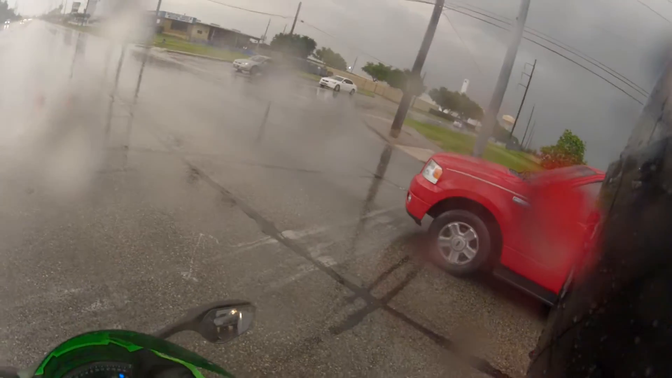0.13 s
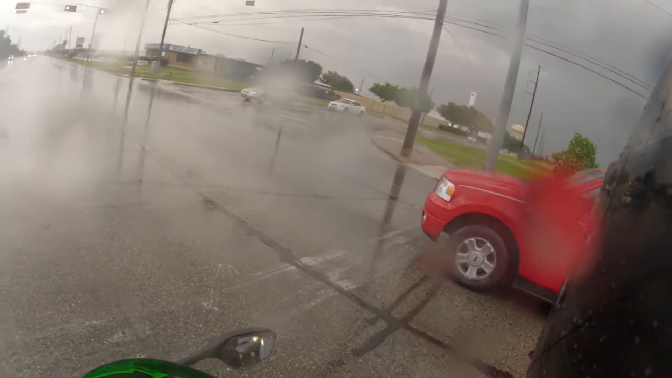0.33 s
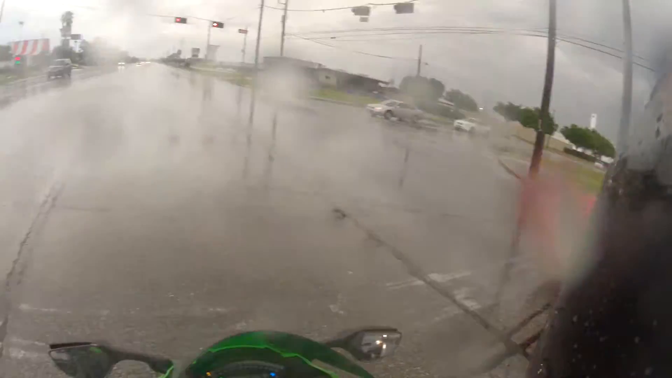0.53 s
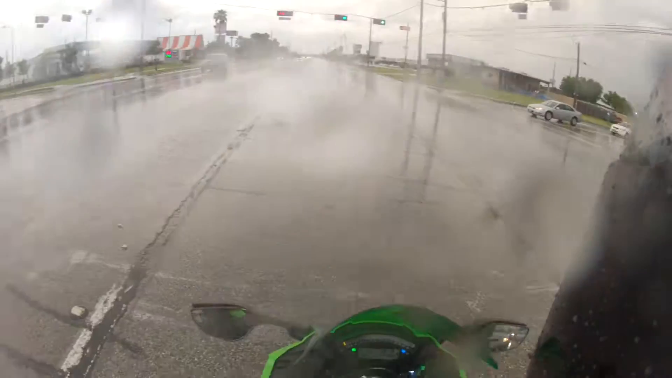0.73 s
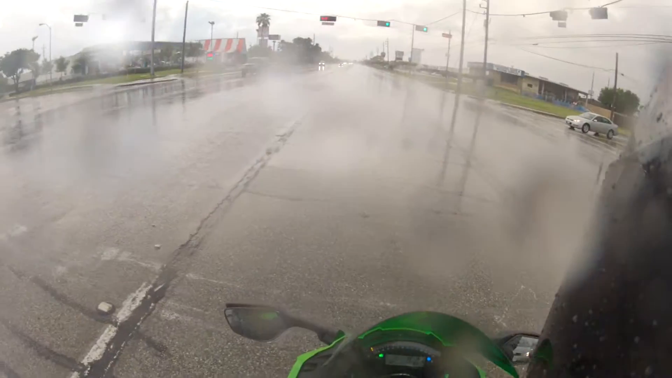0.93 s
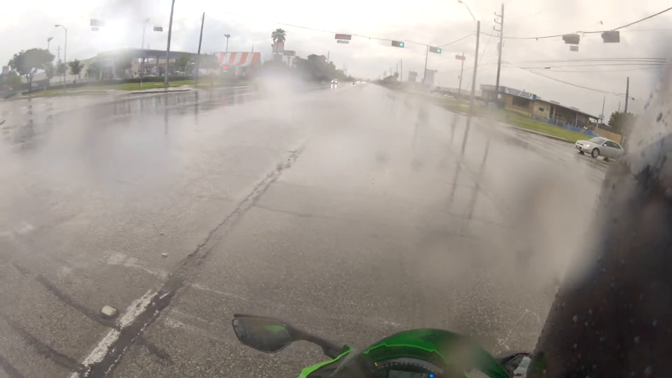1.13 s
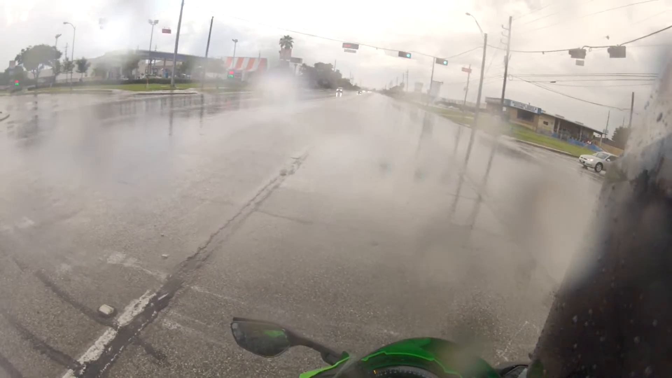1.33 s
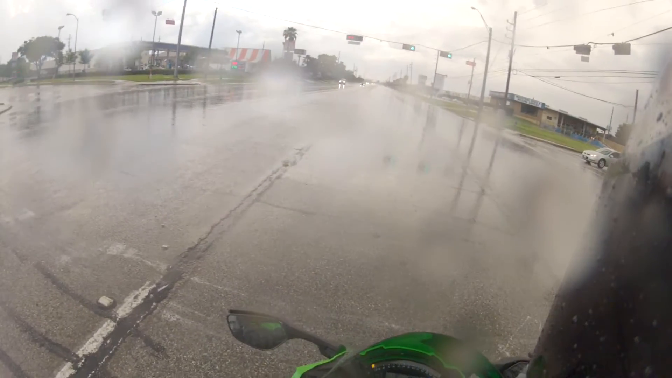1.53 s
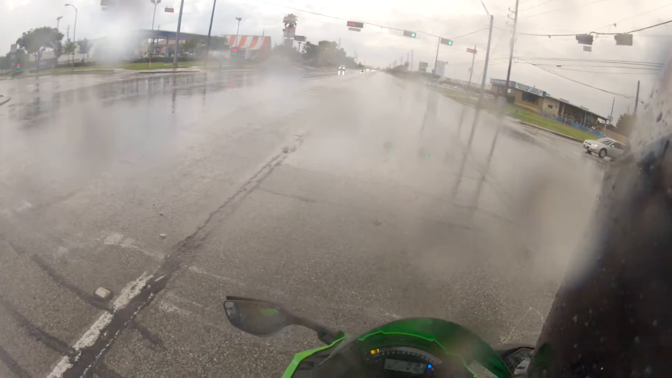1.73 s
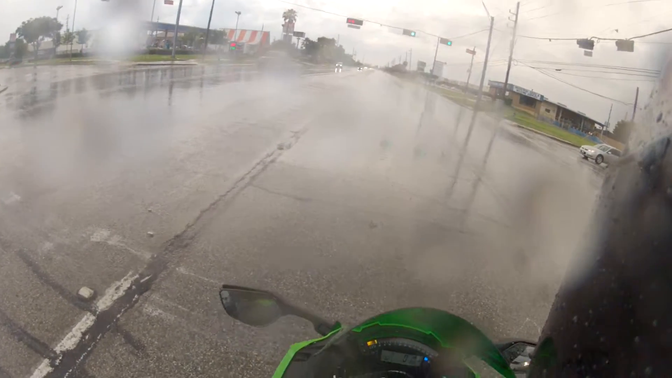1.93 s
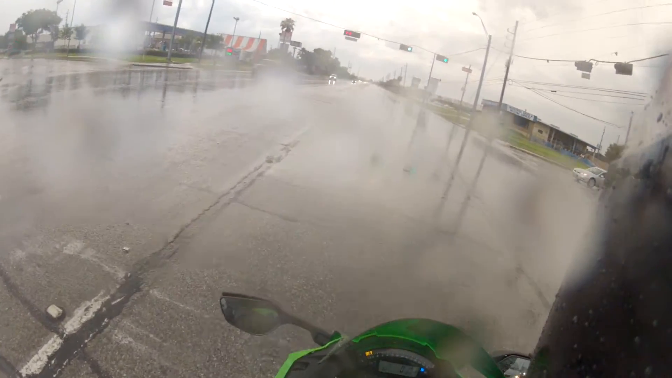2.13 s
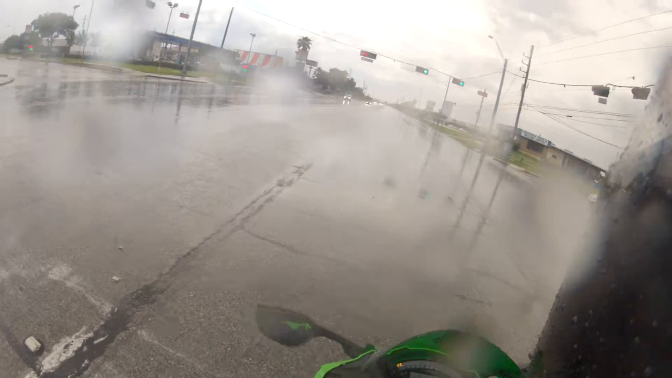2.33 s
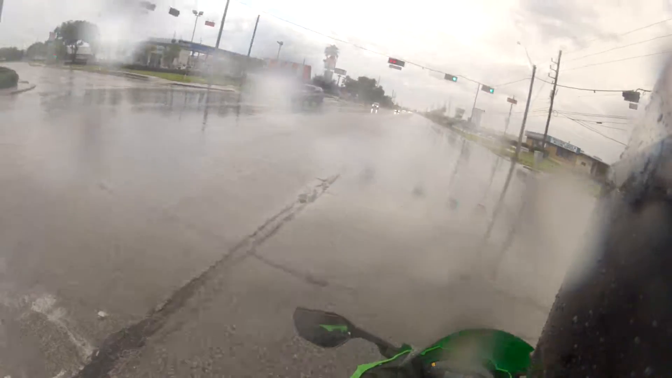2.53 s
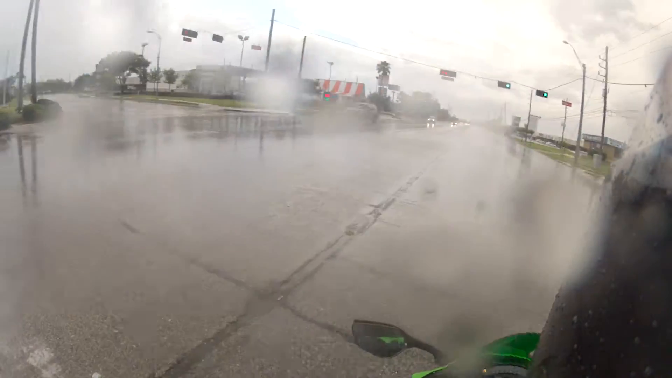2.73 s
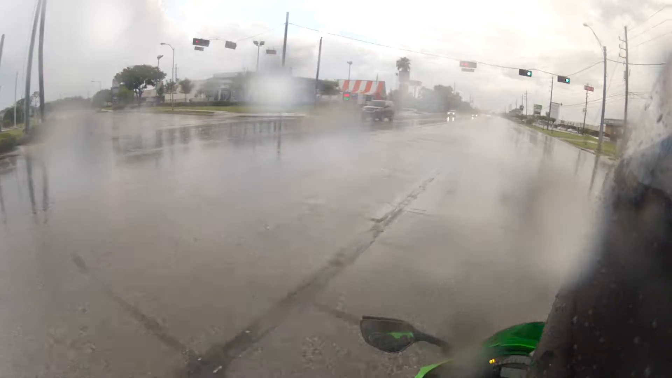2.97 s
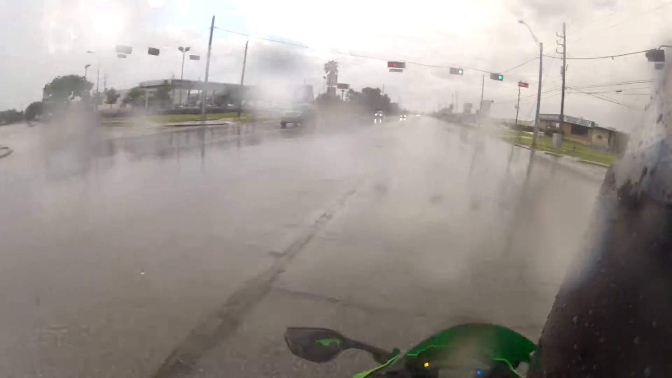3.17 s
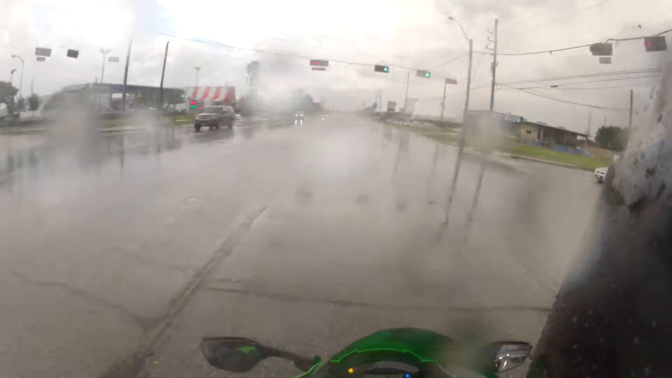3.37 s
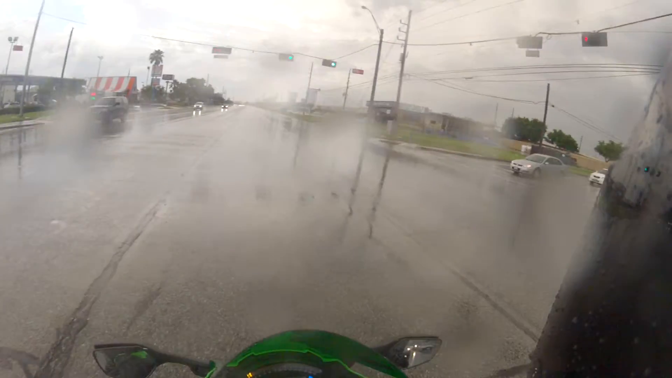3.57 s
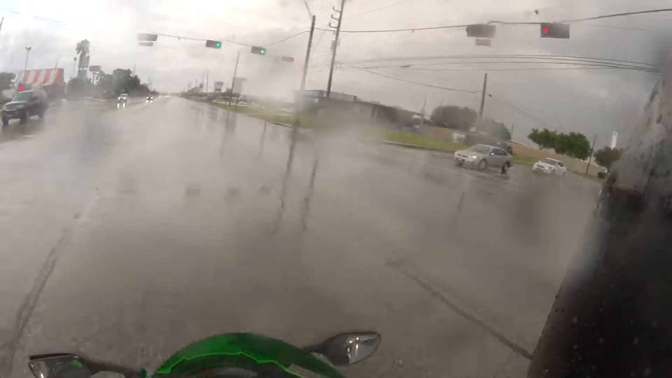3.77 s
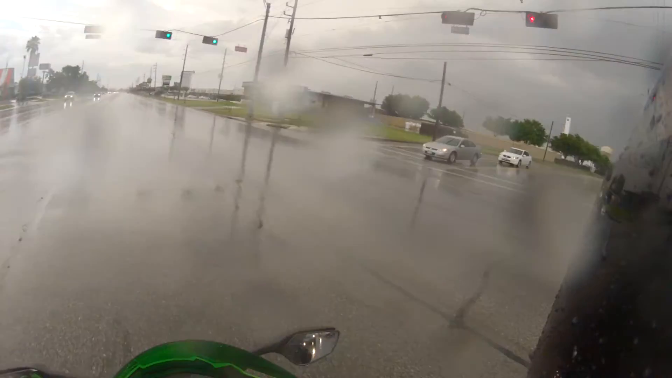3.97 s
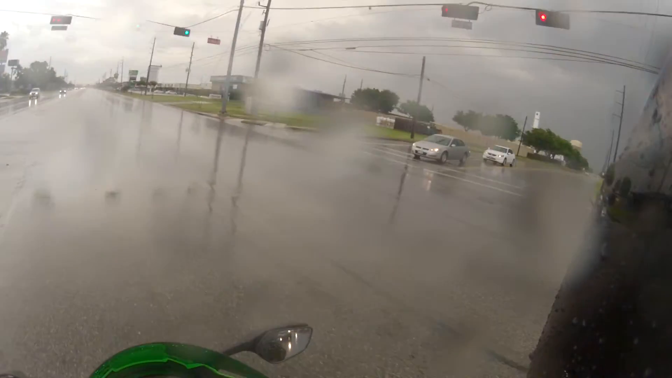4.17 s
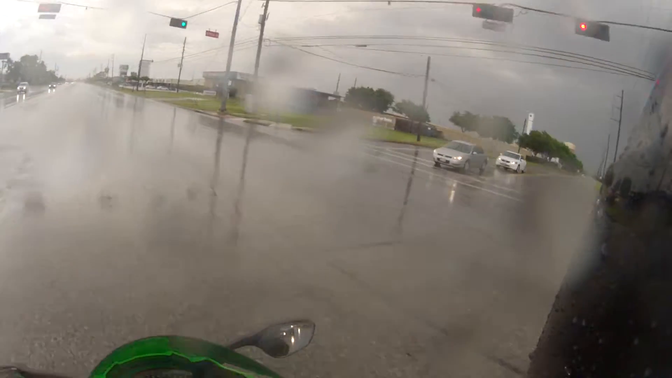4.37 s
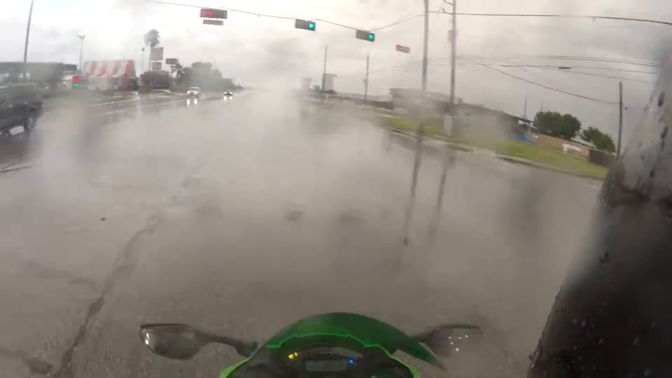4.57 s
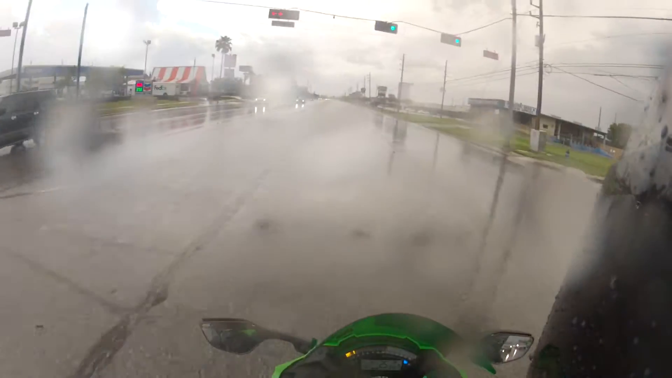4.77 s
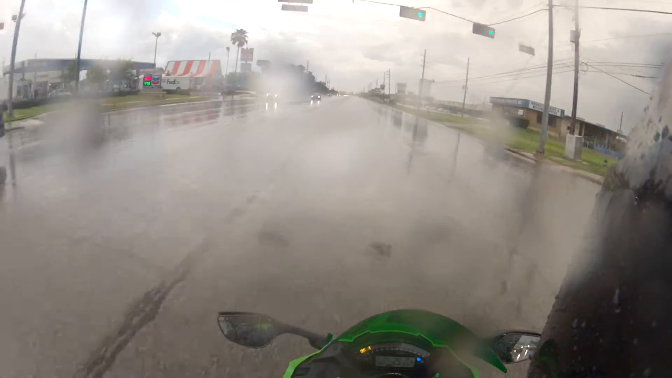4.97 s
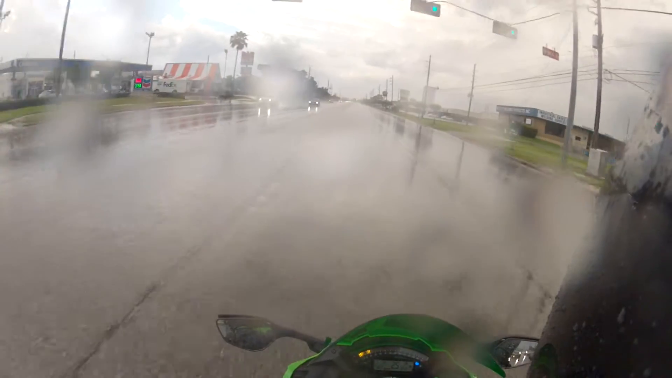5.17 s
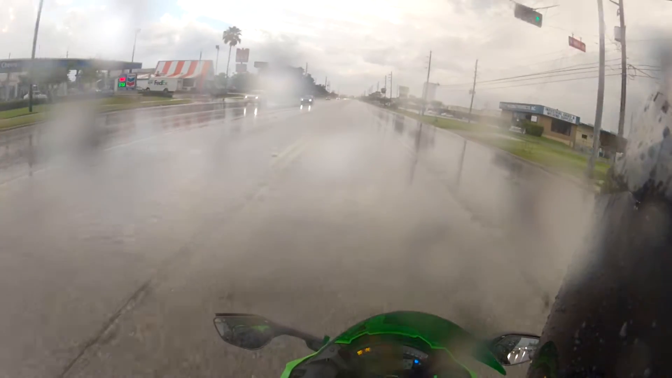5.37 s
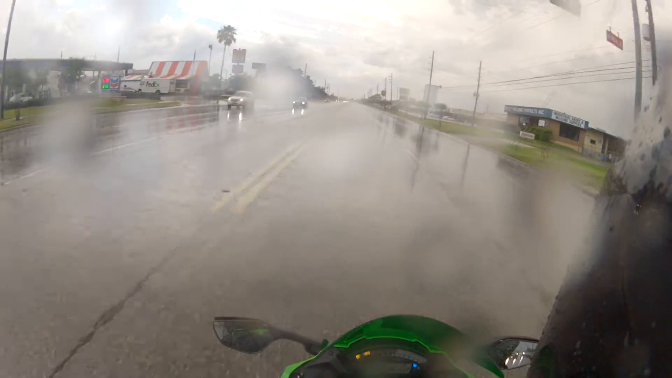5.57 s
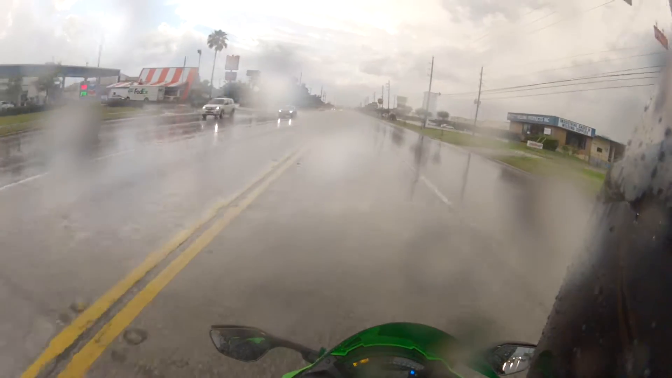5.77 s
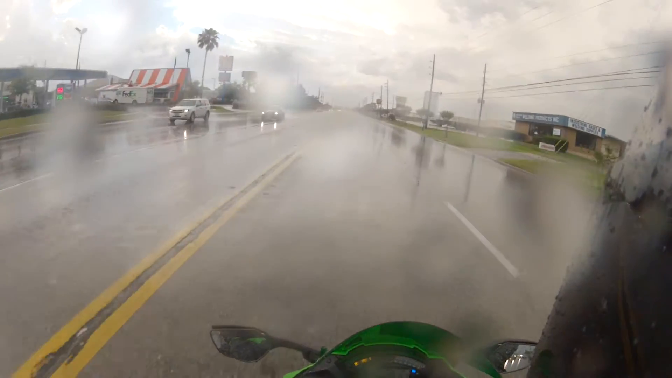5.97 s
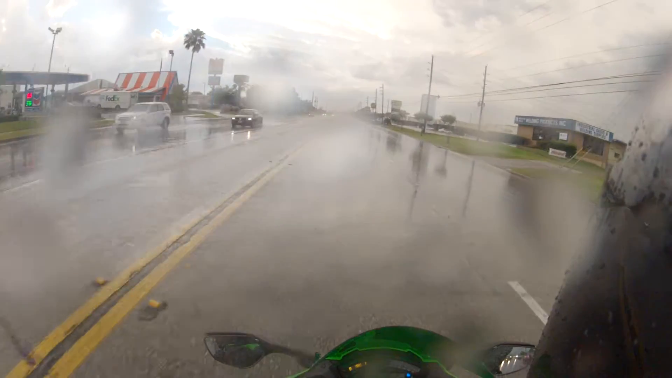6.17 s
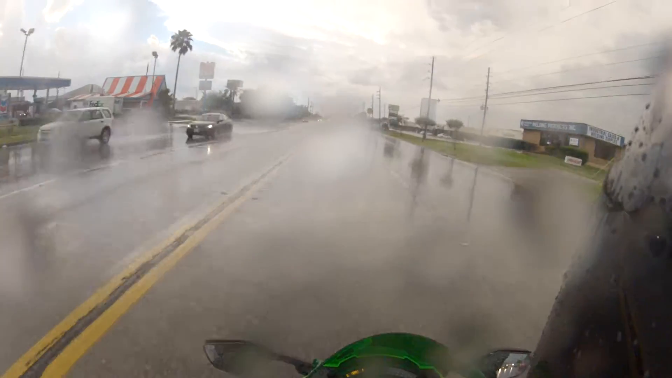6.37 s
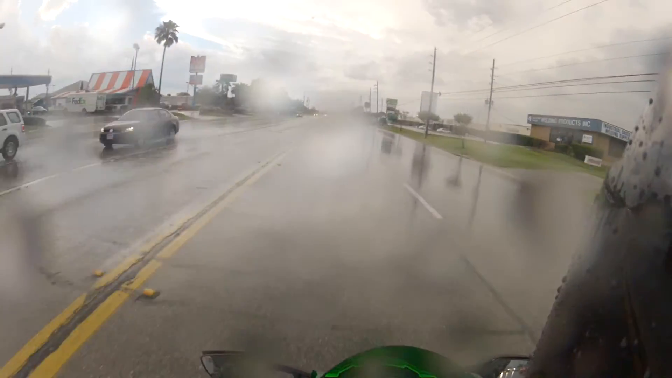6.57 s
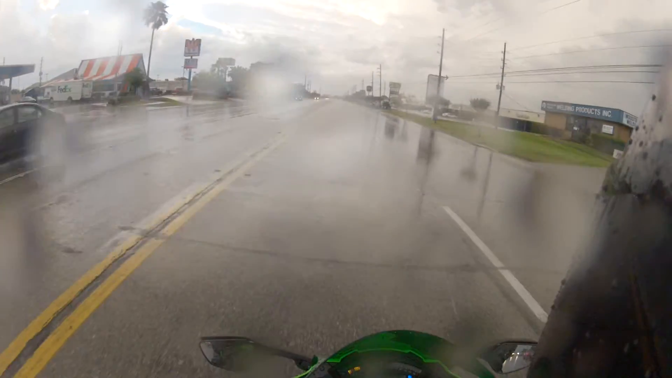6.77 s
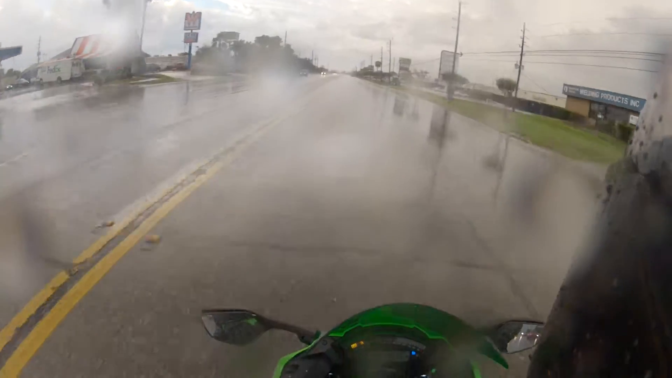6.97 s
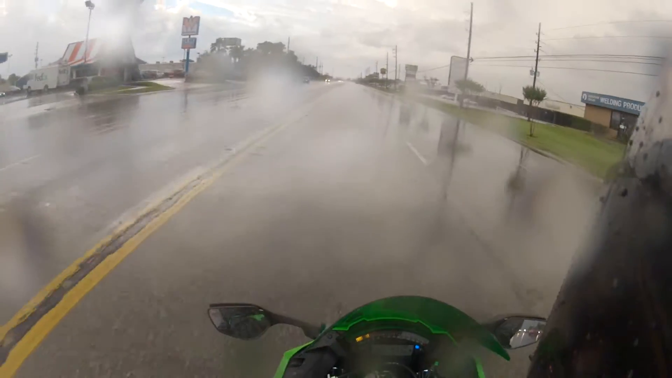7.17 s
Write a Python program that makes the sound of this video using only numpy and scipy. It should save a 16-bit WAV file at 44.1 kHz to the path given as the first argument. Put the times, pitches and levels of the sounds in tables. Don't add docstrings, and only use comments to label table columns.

```python
import sys
import numpy as np
from scipy import signal
from scipy.fft import rfft, irfft, next_fast_len
from scipy.io import wavfile
from scipy.ndimage import uniform_filter1d

SR = 44100
rng = np.random.default_rng(int(sys.argv[2]) if len(sys.argv) > 2 else 0)


def rack_gain(trim_db):
    fader = np.asarray(trim_db, float)
    return 10 ** (fader / 20)


def bounce(signal):
    frames = np.transpose(np.atleast_2d(signal))
    limited = np.clip(frames, -1, 1)
    pcm = np.round(limited * 32767).astype(np.int16)
    wavfile.write(sys.argv[1], SR, pcm)


N = 317961
TIME_S = np.arange(N) / SR
IDLE_END_S = 1.81

# mode_hz, width_hz, level_db
CASE_MODES = [(764, 62, -8.5), (1023, 216, 2), (1238, 210, 2.5), (1650, 500, -0.5), (2100, 650, 3.5),
              (2450, 380, 3.5), (2977, 530, -1.5), (3685, 444, -2), (4500, 3200, -10), (5206, 290, -5.5),
              (5855, 880, -8)]


def evened(x):
    return x / np.sqrt(np.mean(x ** 2) + 1e-20)


def curves(rows):
    s, *columns = np.transpose(rows)
    return [np.interp(TIME_S, s, column) for column in columns]


def slow(hz):
    lowpass = signal.butter(2, hz, fs=SR, output="sos")
    return evened(signal.sosfilt(lowpass, rng.standard_normal(N + SR))[SR:])


def ring(x, modes, size=16384):
    f = abs(np.fft.fftfreq(size, 1 / SR))
    power = sum(rack_gain(2 * db) / (1 + (2 * (f - hz) / width) ** 2) ** 2 for hz, width, db in modes)
    log_gain = np.log(power + 1e-9) / 2
    phase = -signal.hilbert(log_gain).imag
    taps = np.fft.ifft(np.exp(log_gain + 1j * phase)).real[:size // 2]
    return signal.oaconvolve(x, taps / np.linalg.norm(taps))[:len(x)]


def add(mix, s, sound):
    part = mix[round(s * SR):][:len(sound)]
    part += sound[:len(part)]


def idle(firing_hz=39.1, level_db=-52.5, uneven=0.11):
    turns = np.cumsum(firing_hz * (1 + uneven * slow(24.9))) / SR
    firings = np.diff(np.floor(turns), prepend=0)
    firings = evened(firings) + 1.2 * rng.standard_normal(N)
    silencer = [(40, 15, -10), (91.0, 43, 2.0), (112, 37, -5.0),
                (197, 56, -9.0), (280, 190, -13), (530, 310, -19.0)]
    fade_out = np.clip((IDLE_END_S - TIME_S) / 0.055, 0, 1)
    return rack_gain(level_db) * evened(ring(firings, silencer)) * fade_out


def gusts(bump_s=0.041):
    # peak_s, boom_lift_db, buffet_lift_db
    shoves = [(.56, 2, 12), (2.15, 0, 0), (2.49, 4.5, 0), (2.63, -4, 9), (2.97, 3, 9), (3.45, 3, 5),
              (4.1, 8.5, 6), (4.38, 3, 9), (4.521, 1, 0), (4.74, 9, -6), (4.8, 5.5, 22), (4.98, 7.5, 7),
              (5.14, 7, 5), (5.36, 7, 7), (5.54, 9, 6), (5.6, -8, 5), (5.68, 9.5, 9), (5.78, 8, -4),
              (5.86, 1.5, 7), (6.28, 8, 9), (6.42, 6.5, 4), (6.59, 2, 4), (6.9, 0.5, 2), (6.961, 6.5, 3),
              (7.05, 6, 0), (7.13, 10, 3), (7.19, -1, 3), (1.25, -2, 12)]
    t = np.arange(0, N, 64) / SR
    s, *lifts_db = np.transpose(shoves)
    bumps = np.exp(-((t[:, None] - s) / bump_s) ** 2)
    return [np.interp(TIME_S, t, bumps @ lift_db) for lift_db in lifts_db]


def air(patter_per_s=700, patter_share=0.18, size_db=2.5):
    # start_s, rush_db
    rush_levels = [(0.0, -51.5), (1.51, -53), (1.57, -49), (1.87, -43.5), (2.15, -44.5), (2.4, -46.5),
                   (2.97, -46.5), (3.43, -43.5), (3.63, -40), (4.16, -38), (4.7, -31.5), (5.42, -28.5),
                   (5.54, -24), (5.64, -27.5), (6.26, -23.5), (6.59, -23), (6.73, -25), (7.21, -24.5)]
    # mode_hz, width_hz, level_db
    buffet_modes = [(39.5, 43, -13), (74, 59, -23)]
    # mode_hz, width_hz, level_db
    boom_modes = [(115, 35, -4), (160, 45, 0), (215, 40, -15)]
    # mode_hz, width_hz, level_db
    whistle_modes = [(2660, 510, -3), (2720, 540, -15)]
    # mode_hz, width_hz, level_db
    roar_modes = [(250, 91, 1), (318, 124, 0), (458, 244, -1.7), (625, 227, -1.9)]

    rush_db = curves(rush_levels)[0]
    boom_lift_db, buffet_lift_db = gusts()
    standstill = np.clip((2.47 - TIME_S) / 0.15, 0, 1)
    boom_db = -32.5 + 0.91 * (rush_db + 24.5) + boom_lift_db - 5.5 * standstill
    buffet_db = -40.5 + 0.87 * (rush_db + 25) + buffet_lift_db
    whistle_db = -5 + 1.6 * (rush_db + 24.0) + 3.5 * slow(1.16)
    roar_db = -12.5 - 1.9 * standstill

    hiss = rng.standard_normal(N) * rack_gain(0.46 * slow(5.6) + 1.04 * slow(59))
    hits = (rng.random(N) < patter_per_s / SR) * rng.standard_normal(N)
    patter = hits * rack_gain(size_db * np.minimum(rng.exponential(1, N), 4))
    blend = np.sqrt(1 - patter_share) * evened(hiss) + np.sqrt(patter_share) * evened(patter)
    rush = evened(ring(blend, CASE_MODES))
    buffet = evened(ring(rng.standard_normal(N) * rack_gain(2.7 * slow(30)), buffet_modes))
    boom = evened(ring(rng.standard_normal(N) * rack_gain(1.5 * slow(14)), boom_modes))
    whistle = rack_gain(whistle_db) * evened(ring(np.roll(hiss, SR), whistle_modes))
    roar = rack_gain(roar_db) * evened(ring(hiss, roar_modes))
    return rack_gain(rush_db) * (rush + roar + whistle) + rack_gain(buffet_db) * buffet + rack_gain(boom_db) * boom


def raindrop(peak_db, ring_hz, splash_ms, treble_db, bass_db, edge):
    t = np.arange(1600) / SR
    splash = np.exp(-(t / (splash_ms / 1000)) ** edge) + 0.51 * np.exp(-t / 0.0026)
    splash = splash * np.minimum(t / 0.00055, 1)
    grain = rng.standard_normal(len(t)) + 0.28 * np.sin(2 * np.pi * ring_hz * t)
    click = 2.77 * np.exp(-((t - 0.0006) / 0.00003) ** 2)
    modes = []
    for hz, width, db in CASE_MODES:
        tilt_db = (treble_db + 15) * (hz > 3300) - 7.0 * (hz > 4000) + (bass_db + 8.5) * (hz < 1500)
        modes.append((hz, width, db + tilt_db))
    modes.append((480, 500, bass_db + 1.03 * min(peak_db, 9) - 8))
    modes.append((240, 260, bass_db + 0.97 * min(peak_db, 14) - 5.5))
    modes.append((ring_hz, 420, 5.0))
    sound = ring(splash * grain + click, modes, size=2048)
    return rack_gain(peak_db) * sound / abs(sound).max()


def rain():
    # start_s, blow_db before overload, ring_hz, splash_ms, bass_db
    splats = [
        (0.9912, -3.5, 2150, 2.1, -13.5),
        (4.6391, 3.5, 2100, 1.24, -9),
        (4.8022, 10.5, 2305, 3.1, -6.5),
        (5.0892, -.3, 2110, 0.72, -9),
        (5.4417, 17, 2272, 2.35, -5.5),
        (6.0678, 4, 3344, 1.65, -7),
        (6.4523, -0.5, 2450, 1.7, -32),
        (6.6444, 3.5, 3060, 4.1, -6.5),
        (6.755, 8.5, 1530, 2.3, 0),
        (7.1806, -1, 3140, 2.24, -10),
    ]
    # start_s, peak_db, ring_hz, treble_db, bass_db
    clear_drops = [(0.0214, -31.5, 1225, -24, -4), (1.006, -23.5, 1700, -11, -12),
                   (1.1607, -31, 1740, -12, -2), (1.1658, -27, 2350, -2, -6), (1.3743, -34, 1060, -19, -19),
                   (1.844, -17, 2260, -4, -12), (1.907, -28.5, 975, -8, 8), (1.9642, -29, 1250, -6, -13),
                   (2.555, -20.5, 3110, -6.5, -9), (2.954, -19, 1650, -13, -7.5),
                   (3.3241, -23, 2280, -5, -4.5), (3.7485, -21.5, 2230, -26, -1.5),
                   (3.8163, -20.5, 1650, -19, -3.5), (3.925, -26.5, 1030, -19, -2),
                   (3.974, -24, 2380, 0, -19), (3.9976, -11, 2270, -7.5, -31),
                   (4.1357, -24.5, 1090, -25, -2), (4.328, -17, 2130, 0, -11), (4.375, -11.5, 2210, -16, 2),
                   (4.3917, -12, 2110, -5, -4.5), (5.5619, -4, 1890, -15, -8), (6.3167, -5, 2310, 0, -30),
                   (6.885, -12.5, 1040, -10, -14), (7.152, -9, 2155, -1, -19)]
    # start_s, peak_db, ring_hz
    faint_drops = [(0.2338, -35, 2320), (0.7666, -36, 2320), (0.823, -33.5, 1090), (1.1504, -44, 1700),
                   (1.181, -36, 2280), (1.2095, -36, 2050), (1.222, -36, 1120), (1.5817, -39, 1730),
                   (1.6401, -34, 2300), (2.0568, -34, 1021), (2.1369, -29, 1860), (2.987, -31.5, 1016),
                   (3.027, -32, 1880), (3.3685, -30.5, 980), (3.731, -25, 1650), (3.7894, -28, 1690),
                   (4.0665, -30, 2033), (4.1049, -27, 1080), (4.226, -32, 1196), (4.3148, -21, 2180),
                   (4.7257, -23, 2110), (4.8592, -18, 2136), (5.0164, -13.5, 2380), (5.5258, -10, 2080),
                   (5.686, -9, 2500), (6.1507, -13, 1780), (6.52, -16, 1990), (6.7285, -13, 2320),
                   (6.8088, -15.5, 2450)]

    mix = np.zeros(N)
    for s, db, hz, ms, bass_db in splats:
        treble_db = -16 + 8 * (hz / 1000 - 2.2) + 0.1 * db
        add(mix, s, raindrop(db, hz, ms, treble_db, bass_db, edge=4))
    small_drops = [tuple(row) for row in clear_drops]
    small_drops += [tuple(row) + (-7.5, -3) for row in faint_drops]
    for s, db, hz, treble_db, bass_db in small_drops:
        driven = s > IDLE_END_S or db > -26
        splash_ms = 3 if driven else 5.1
        add(mix, s, raindrop(db, hz, splash_ms, treble_db, bass_db, edge=0.87))
    return mix


def engine(waver_db=1.7, waver_hz=9):
    # start_s, firing_hz, tone_db, throttle_0_to_1
    revs = [(1.5, 38, -60, .7), (1.7, 89.7, -42, .7), (1.8, 111.5, -42, .6), (1.91, 119.3, -40.5, .45),
            (2.05, 114.5, -38.5, .4), (2.4, 82, -43, .25), (2.71, 76.6, -42.5, .1),
            (2.96, 83.4, -42.5, .23), (3.23, 77, -42, .13), (3.65, 80, -42, .2), (3.92, 78.6, -40, .45),
            (4.54, 103.5, -36.5, .85), (5.41, 140, -35, .85), (5.92, 162.8, -31, .35),
            (6.43, 178.8, -32, 0), (6.58, 163, -43, .15), (6.85, 134.5, -43.5, .4), (7.21, 141.8, -39, 1)]
    # start_s, grip_0_to_1
    clutch = [
        (2.0, .2),
        (2.5, .75),
        (4.4, 1),
        (6.43, 1),
        (6.55, 0),
    ]
    # multiple, level_db
    whole_orders = [(2, -1.5), (3, 0), (4, -1.5), (5, 1), (6, -6), (7, -10), (8, -8), (9, -11), (10, -12)]
    # multiple, level_db
    half_orders = [(.5, -9), (1.5, -5), (2.5, 1), (3.5, 0), (4.5, -.5), (5.5, -6), (6.5, -9), (7.5, -1),
                   (8.5, -5), (9.5, -12)]
    # duct_hz, gain_db
    exhaust = [(150, -1.5), (190, -6), (240, 0), (340, 0), (390, -13), (470, -8), (560, -14), (680, -7),
               (800, -16), (1200, -24)]
    # duct_hz, gain_db
    air_box = [(40, -3), (250, -7), (350, -8), (400, -8), (480, 0), (530, -13), (700, -3), (800, -12),
               (1200, -22)]

    firing_hz, tone_db, throttle = curves(revs)
    muffled_db = 0.11 * np.maximum(firing_hz - 110, 0)
    whole_db = tone_db - 15 + 8.5 * curves(clutch)[0] - muffled_db
    half_db = tone_db - 22 + 15 * throttle
    phase = 2 * np.pi * np.cumsum(firing_hz) / SR
    sound = rack_gain(tone_db + 0.68 * slow(27)) * np.sin(phase)
    waver = waver_db * slow(waver_hz)
    families = (whole_orders, exhaust, whole_db), (half_orders, air_box, half_db)
    for orders, duct, family_db in families:
        duct_hz, duct_db = np.transpose(duct)
        for k, order_db in orders:
            colour_db = np.interp(np.log(k * firing_hz), np.log(duct_hz), duct_db)
            own_waver_db = np.roll(waver, rng.integers(N))
            gain = rack_gain(family_db + order_db + colour_db + own_waver_db)
            sound += gain * np.sin(k * phase + 2 * np.pi * rng.random())
    fade_in = np.clip((TIME_S - revs[0][0]) / 0.07, 0, 1)
    return np.sqrt(2) * sound * fade_in


def scene():
    return (idle() + air() + rain() + engine())[None]


def gain_control(x):
    power_db = 10 * np.log10(abs(uniform_filter1d(x ** 2, 200)) + 1e-12)
    fall_db = np.arange(N) * 154.0 / SR
    over_db = np.maximum(np.maximum.accumulate(power_db + fall_db) - fall_db + 16.5, 0)
    late_db = np.concatenate([np.zeros(230), over_db])[:N]
    return x / rack_gain(0.67 * uniform_filter1d(late_db, 60))


def overload(x):
    return 0.54 * np.tanh(np.clip(x / 0.55, -9, 9) + 0.22 * np.clip(x / 0.75, -9, 9) ** 3)


def sample_hold(x, hold_hz=12000):
    mirrored = x * (1 + 2 * np.cos(2 * np.pi * hold_hz * TIME_S))
    size = next_fast_len(N)
    f = np.fft.rfftfreq(size, 1 / SR)
    slope = np.sinc(f / hold_hz) / np.sinc(f / (4 * hold_hz))
    return irfft(rfft(mirrored, size) * slope, size)[:N]


def empty_weak_bands(x):
    # band_hz, limit_db over the mean band
    band_limits = [(2800, -40), (4500, -17.5), (6000, -15), (7500, -15.5), (9000, -24), (10600, -17),
                   (11500, -24), (12500, -24), (13400, -16), (14200, -26), (15150, -22), (15350, 1),
                   (16500, 5), (16600, 40)]
    f, t, z = signal.stft(x, SR, nperseg=2048)
    bands = uniform_filter1d(abs(z) ** 2, size=11, axis=0)
    whole = signal.medfilt((abs(z) ** 2).mean(0), kernel_size=5)
    limit = rack_gain(2 * np.interp(f, *np.transpose(band_limits)))[:, None] * whole
    return signal.istft(z * (bands > limit), SR, nperseg=2048)[1][:len(x)]


def low_pass(x):
    return signal.sosfilt(signal.butter(12, 16500, fs=SR, output="sos"), x)


def record(dry):
    x = overload(gain_control(dry[0]))
    x = signal.oaconvolve(x, signal.firwin(161, 5780, fs=SR), "same")
    finished = empty_weak_bands(sample_hold(x))[None]
    return low_pass(finished)


dry = scene()
out = record(dry)
bounce(out)
```